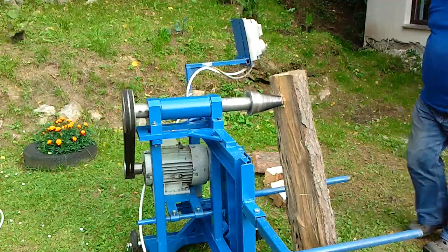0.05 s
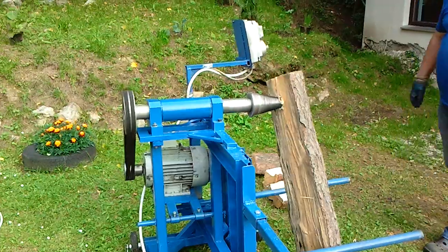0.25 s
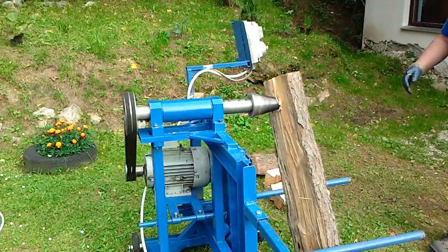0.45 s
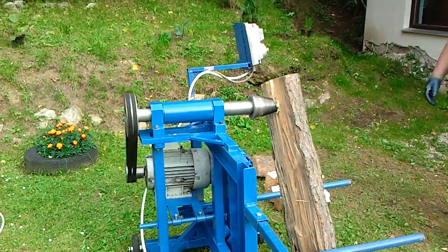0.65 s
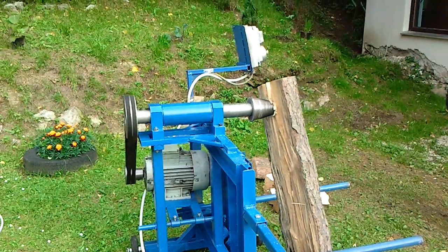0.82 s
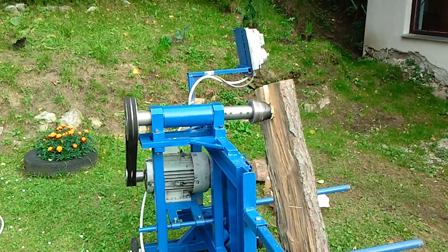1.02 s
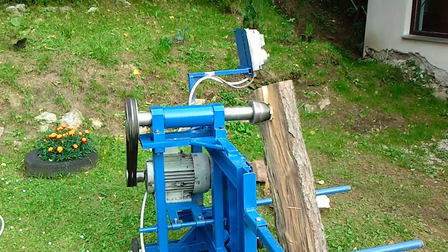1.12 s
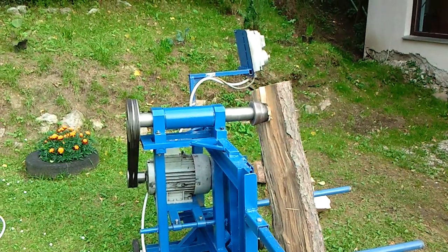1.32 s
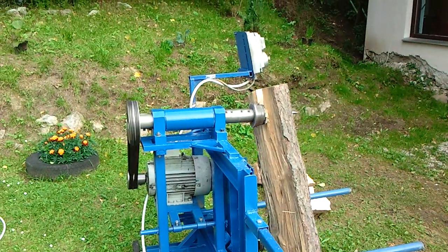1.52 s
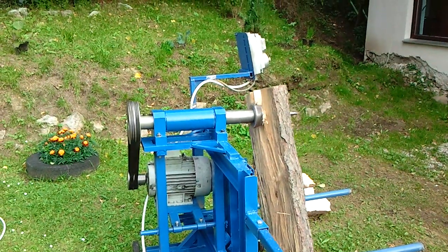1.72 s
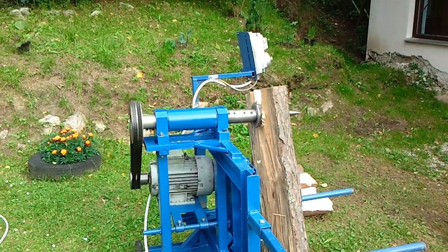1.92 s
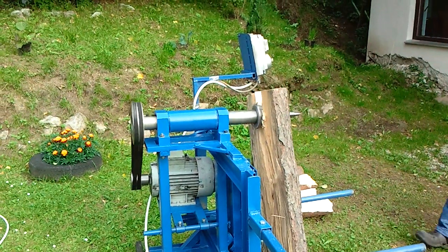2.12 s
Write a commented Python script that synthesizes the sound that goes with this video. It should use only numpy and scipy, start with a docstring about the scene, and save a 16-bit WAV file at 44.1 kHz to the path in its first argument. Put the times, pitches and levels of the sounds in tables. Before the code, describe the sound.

Wood splits with one loud crack, a run of smaller snaps, creaks and dull thumps, then another loud crack. An electric splitter's motor and belt drone underneath, heard from a few metres away in a garden.

```python
"""Screw splitter in a garden

An electric splitter bores its steel cone into a log, a few metres from the microphone. The wood gives way
in irregular cracks: a splinter rings, the log knocks, fibres rip and snap; in between it groans, crackles
and thumps on its rest. The steel frame rings along over the drone of motor and belt, a house wall and a
grassy bank scatter the sound back, and the loudest cracks overload the microphone."""
import sys
import numpy as np
from scipy import signal
from scipy.fft import rfft, irfft
from scipy.io import wavfile
from scipy.ndimage import uniform_filter1d

SR = 44100
rng = np.random.default_rng(int(sys.argv[2]) if len(sys.argv) > 2 else 0)


def materialize(psi):
    """Save the field psi as 16-bit PCM at rate SR to the path in sys.argv[1].

    A 1-D psi becomes a single channel; in a 2-D psi each row is a channel.
    """
    bounded = np.clip(np.atleast_2d(psi).T, -1, 1)
    quanta = np.round(bounded * 32767).astype(np.int16)
    wavfile.write(sys.argv[1], SR, quanta)


N = 94815
BLOW_S = 0.0075  # cracks and ticks have their levels set over this time

# spectrum of a snapping fibre (frequency [Hz], relative level [dB])
SNAP_SPECTRUM = [(1500, -21.5), (3000, 1), (4400, -2), (5600, 1), (7500, -6), (9000, -14)]


def undb(db):
    """Decibels to gain."""
    return 10 ** (np.asarray(db) / 20)


def unit(x, count=None):
    """Scale to rms 1 over the first count samples, or over all."""
    return x / np.sqrt(np.mean(x[:count] ** 2) + 1e-18)


def add(out, start, x):
    """Mix x into out from a start time in seconds."""
    i = int(start * SR)
    out[i:i + len(x)] += x[:len(out) - i]


def colour(x, points, size=2048):
    """Minimum-phase filter through points of (frequency [Hz], gain [dB])."""
    hz, db = np.array(points).T
    bins_hz = np.fft.rfftfreq(size, 1 / SR)
    gain = undb(np.interp(np.log(bins_hz + 1), np.log(hz), db))
    cepstrum = irfft(np.log(gain))
    cepstrum[1:size // 2] *= 2
    cepstrum[size // 2 + 1:] = 0
    impulse = irfft(np.exp(rfft(cepstrum)))[:size // 2]
    return signal.fftconvolve(x, impulse)[:len(x)]


def wander(per_s):
    """Smoothed random steps at rms 1."""
    hold = int(SR / per_s)
    steps = rng.standard_normal(N)[np.arange(N) // hold]
    return unit(uniform_filter1d(uniform_filter1d(steps, hold), hold))


def motor():
    """Motor and drive hum in wavering tones over the fluttering noise of belt and fan."""
    # tones of motor and drive (frequency [Hz], level [dB])
    tones = [(66, -51.5), (99.3, -57), (172, -54), (549, -45.5), (684, -47.5)]
    # running noise of belt, fan and bearings (frequency [Hz], relative level [dB])
    belt_spectrum = [(30, 2), (64, 3), (90, 4.5), (140, 6), (220, -1.5), (290, 10), (370, -8), (510, 6),
                     (780, 8.5), (1000, -9.5), (2000, -8), (3700, -47), (9000, -38.5)]
    hum = 0
    for hz, db in tones:
        amplitude = np.sqrt(2) * undb(db + 2 * wander(per_s=11.04))
        pitch = hz * (1 + 0.01212 * wander(per_s=25.03))
        hum += amplitude * np.sin(2 * np.pi * np.cumsum(pitch) / SR)
    belt_db = -38 - 0.5 * wander(per_s=45.6)
    return hum + undb(belt_db) * unit(colour(rng.standard_normal(N), belt_spectrum))


def tiny_fractures(per_s, middle_hz, octaves, rise_cycles):
    """Wood parts at random instants, each fracture a few cycles at a pitch of its own."""
    out = np.zeros(N)
    wait, strength, phases, detune = rng.random((12000, 4)).T
    starts = np.cumsum(-np.log(1 - wait)) / per_s
    sizes = undb(np.minimum(-np.log(1 - strength), 4))  # a few stand out, by up to 4 dB
    pitches = middle_hz * 2 ** (octaves * np.sqrt(2) * np.arcsin(2 * detune - 1))
    for start, size, hz, phase in zip(starts[starts < N / SR], sizes, pitches, phases):
        t = np.arange(int(10 * rise_cycles * SR / hz)) / SR
        age = t * hz / rise_cycles
        add(out, start, size * age * np.exp(-age) * np.sin(2 * np.pi * (hz * t + phase)))
    return unit(out)


def straining_wood():
    """Tiny fractures bunch in flurries: a groan in the log, crackle in the splinters, ticking fibres."""
    # the log under strain (time [s], groan [dB], crackle [dB], fine ticking [dB])
    strain = [(0, -36, -36, -52), (.24, -50, -40.5, -56.5), (.268, -38, -29, -47.5),
              (.33, -44.5, -34.5, -49.5), (.45, -44, -31, -41.5), (.55, -28.5, -27.5, -46.5),
              (.678, -21, -20, -41.5), (.73, -35.5, -34, -44), (.85, -34.5, -34.5, -44.5),
              (.891, -28, -27.5, -41.5), (1.02, -43.5, -34.5, -48.5), (1.079, -35, -27.5, -37.5),
              (1.15, -44, -33, -44.5), (1.34, -34.5, -28, -44), (1.56, -45.5, -40, -50.5),
              (1.62, -29, -30, -43.5), (1.75, -47, -36.5, -44), (1.84, -31, -23.5, -40),
              (1.92, -43, -36, -53), (2.15, -35.5, -39.5, -52.5)]
    # fractures of groan, crackle and ticking (rate [1/s], pitch [Hz], spread [octaves], rise [cycles])
    kinds = [(906.3, 472, 0.56, 0.91), (1392, 1328, 0.46, 0.73), (1954, 4150, 0.5, 0.35)]
    times, *levels = np.array(strain).T
    t = np.arange(N) / SR
    flurry_db = 2.5 * wander(per_s=120)
    return sum(undb(np.interp(t, times, db) + flurry_db) * tiny_fractures(*kind)
               for db, kind in zip(levels, kinds))


def steel_frame(wood):
    """The machine's frame rings on after each fracture."""
    # modes of the frame with the log on it (frequency [Hz], t60 [s], relative gain [dB])
    modes = [(183, 0.071, 3), (268, 0.64, 6.5), (303.5, 0.42, 8), (550.2, 0.31, 9), (636, 1, -18),
             (765.7, 0.12, 8), (1007, 0.04, 2), (2070, 0.33, -5), (2960, 0.59, -14)]
    out = 0
    for hz, t60, db in modes:
        radius = np.exp(-np.log(1000) / (t60 * SR))
        pole = radius * np.exp(2j * np.pi * hz / SR)
        out += undb(db) * signal.lfilter([2 * (1 - radius)], [1, -pole], wood).imag
    return undb(-7) * out


def garden_scatter(wood, delay_s=0.011, t60_s=0.24):
    """House wall and grassy bank throw a short, dull tail back to the microphone."""
    t = np.arange(N // 4) / SR
    tail = rng.standard_normal(len(t)) * np.exp(-np.log(1000) * t / t60_s) * (t > delay_s)
    tail /= np.sqrt(np.sum(tail ** 2))
    tail = colour(tail, [(300, 3), (1100, -3), (2500, 1.5), (8000, -10)])
    return undb(-14.5) * signal.fftconvolve(wood, tail)[:N]


def fibre_burst(spectrum, decay_s, rise_s=0.00054):
    """A short gritty rush of breaking fibres, with the energy of rms 1 held for BLOW_S."""
    t = np.arange(4096) / SR
    noise = rng.standard_normal(len(t))
    grit = np.sign(noise) * np.abs(noise) ** 1.74
    envelope = np.minimum(t / rise_s, 1) * np.exp(-t / decay_s)
    burst = colour(grit * envelope, spectrum)
    return burst * np.sqrt(BLOW_S * SR / np.sum(burst ** 2))


def fibre_ticks():
    """Lone fibres part with a dry, bright tick."""
    # snapping fibres (time [s], level [dB])
    ticks = [(0.0673, -47.5), (0.0811, -40.5), (0.1935, -40.5), (0.983, -47), (1.036, -40), (1.2297, -35),
             (1.617, -40), (1.6548, -34.5), (1.706, -34.5), (1.89, -49), (2.1203, -42)]
    out = np.zeros(N)
    for start, db in ticks:
        add(out, start, undb(db) * fibre_burst(SNAP_SPECTRUM, decay_s=0.0014))
    return out


def dying_tones(strikes):
    """One exponentially fading sine for each strike."""
    out, t = np.zeros(N), np.arange(N // 8) / SR
    for start, hz, decay_s, db in strikes:
        add(out, start, undb(db) * np.sin(2 * np.pi * hz * t) * np.exp(-t / decay_s))
    return out


def log_thumps():
    """The log shifts heavily against its rest."""
    # thumps (time [s], pitch [Hz], decay [s], starting level [dB])
    thumps = [(.243, 80, 0.0061, -15.5), (.533, 105, 0.012, -15), (.744, 70.6, 0.029, -29),
              (1.801, 54, 0.018, -22.5), (2.008, 300, 0.017, -19), (2.089, 298, .014, -23)]
    return dying_tones(thumps)


def cracks():
    """The wood gives way: a splinter's ring swells while the log knocks and fibres rip and snap."""
    # cracks (time [s], splinter pitch [Hz], rise [ms], splinter [dB], knock [dB], rip [dB], snap [dB])
    breaks = [ (0.2431, 1144, 4.76, -1, -8.5, -15, -31.5), (0.275, 1170, 1.2, -37, -20, -27, -51),
              (.352, 1084, 5.9, -25.5, -37, -33.5, -43.5), (.3665, 890, 2.1, -26, -35.5, -30, -35.5),
              (.3721, 2040, 0.91, -23, -24.5, -20, -34.5), (.403, 1960, 2.6, -24.5, -26, -45.5, -56),
              (0.426, 1113, 2, -25, -41, -28, -37), (0.4328, 1100, 1.5, -17.5, -40, -30, -39),
              (.519, 1130, 1.4, -22, -30, -33, -50), (.531, 932, 3.7, -13, -20, -18.5, -56),
              (.5359, 998, 4.7, -13.5, -21, -14, -29), (.545, 1163, 4, -19.5, -15, -20, -52),
              (.573, 1880, 3.6, -19.5, -20, -29, -55), (.606, 1037, 1.8, -26.5, -22.5, -43, -51.5),
              (0.66, 2190, 2.7, -28, -30.5, -24.5, -52), (.668, 507, 1.6, -24.5, -25, -19.5, -36),
              (.672, 1500, 2.5, -27, -42, -24, -31), (0.7654, 2120, 2.1, -25.5, -45, -27, -41),
              (0.774, 1084, 3.8, -16, -19.5, -19.5, -31.5), (.847, 2170, 2.4, -28, -38, -25, -41),
              (.8715, 955, 2.4, -12.5, -12.5, -23, -28.5), (.876, 419, 2.05, -17.5, -35, -44, -46),
              (.988, 1140, 2.5, -26, -39, -27.5, -47), (1.045, 984, 4.8, -17.5, -16, -17, -27.5),
              (1.049, 1986, 1.8, -15.5, -25.5, -21, -42), (1.0621, 1084, 3.5, -16.5, -13.5, -22, -36),
              (1.1167, 1566, 4.3, -24, -31, -23, -34.5), (1.131, 1855, 4, -30, -38.5, -25, -42.5),
              (1.173, 1725, 1.7, -34, -39, -26, -39.5), (1.185, 1516, 2.7, -24.5, -34.5, -26, -33.5),
              (1.201, 936, 2.9, -24.5, -44, -20, -35.5), (1.2496, 1147, 1.6, -12.5, -28, -22.5, -47),
              (1.3083, 1070, 1.1, -26.5, -13, -16, -30), (1.313, 1400, 1.74, -14, -26, -32, -50.5),
              (1.37, 952, 4.5, -21.5, -20, -32, -32), (1.407, 1187, 2.7, -12, -35.5, -30.5, -41),
              (1.431, 990, 3.8, -22.5, -28.5, -22.5, -29.5), (1.4926, 1136, 2.2, -13, -39, -23, -37),
              (1.592, 2925, 3, -25.5, -16, -25.5, -22.5), (1.6882, 970, 1.4, -19.5, -12.5, -19.5, -24),
              (1.692, 900, 3, -19, -28, -38, -44), (1.719, 1565, 4.5, -26, -25.5, -20.5, -41),
              (1.754, 2370, 6, -31.5, -50, -26.5, -44), (1.775, 560, 2.6, -25, -23, -30.5, -40),
              (1.801, 1240, 4.03, -3, -3, -17.5, -21), (1.807, 656, 2.52, -8.5, -35, -27, -46),
              (1.8193, 3450, 2.7, -27, -20.5, -23, -30), (1.833, 1920, 2.1, -21.5, -21, -19, -45),
              (1.856, 1300, 2.5, -22.5, -45, -29, -48), (2.053, 1170, 1.74, -22.5, -45, -41, -40)]
    # spectrum of the knocking log (frequency [Hz], relative level [dB])
    knock_spectrum = [(30, -33), (100, -18), (210, -25), (300, -3), (420, -11.5), (580, 4.5), (760, -1),
                      (1100, 0.5), (2200, -56), (5000, -69)]
    # spectrum of ripping fibres (frequency [Hz], relative level [dB])
    rip_spectrum = [(200, -24.5), (800, -12.5), (1400, -3.5), (2000, 1), (2600, -11), (3400, -17),
                    (4500, -29), (9000, -66.5)]
    out, t = np.zeros(N), np.arange(4096) / SR
    for start, hz, rise_ms, splinter_db, knock_db, rip_db, snap_db in breaks:
        age = t / (rise_ms / 1000)  # 1 at the top of the swell
        swell = np.minimum(age, 1) * np.exp(-np.maximum(age - 1, 0) / 0.87)
        pitch = hz * (1 + 0.0051 * (1 - np.minimum(age, 2)))  # sags as the splinter lets go
        splinter = swell * np.sin(2 * np.pi * np.cumsum(pitch) / SR)
        add(out, start, undb(splinter_db) * unit(splinter, count=int(BLOW_S * SR)))
        add(out, start, undb(knock_db) * fibre_burst(knock_spectrum, decay_s=0.0047))
        add(out, start, undb(rip_db) * fibre_burst(rip_spectrum, decay_s=0.0056))
        add(out, start, undb(snap_db) * fibre_burst(SNAP_SPECTRUM, decay_s=0.0026))
    return out


def splinter_twangs():
    """Strained splinters twang on briefly."""
    # twangs (time [s], pitch [Hz], decay [s], starting level [dB])
    twangs = [(.532, 2317, 0.012, -14), (.536, 2000, .034, -17.5), (1.696, 578, 0.015, -13.5),
              (1.893, 2750, 0.0021, -22), (1.935, 2330, 0.0027, -27)]
    return dying_tones(twangs)


def scene():
    """Splitting wood, ringing frame and motor in the open air, in mono from a few metres."""
    wood = cracks() + fibre_ticks() + straining_wood()
    ringing = steel_frame(wood) + garden_scatter(wood)
    return (wood + ringing + log_thumps() + splinter_twangs() + motor())[None]


def record(dry, mic_top_hz=8350, clip_level=0.705, top_hz=16000):
    """The microphone passes little high treble and clips flat on the loudest cracks."""
    # treble above about 7 kHz gently lowered after clipping (frequency [Hz], gain [dB])
    treble_shelf = [(7300, 0), (8300, -4), (9300, -9)]
    mic_lowpass = signal.ellip(8, 0.3, 70, mic_top_hz, fs=SR, output="sos")
    final_lowpass = signal.ellip(8, 0.1, 70, top_hz, fs=SR, output="sos")
    heard = signal.sosfilt(mic_lowpass, dry[0])
    clipped = np.clip(heard, -clip_level, clip_level)
    return signal.sosfilt(final_lowpass, colour(clipped, treble_shelf))[None]


dry = scene()
out = record(dry)
materialize(out)
```